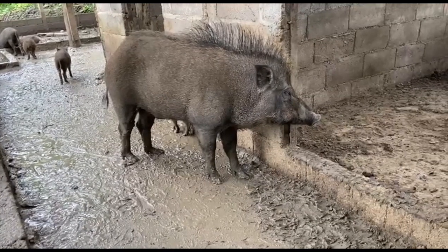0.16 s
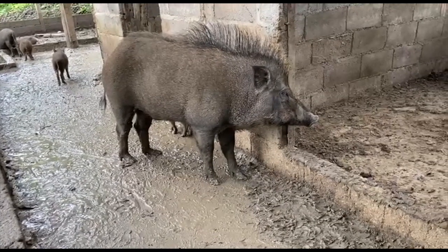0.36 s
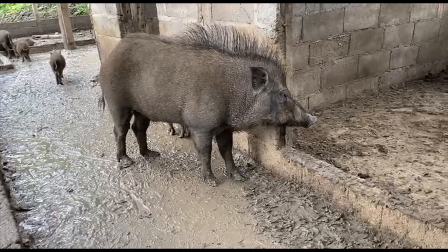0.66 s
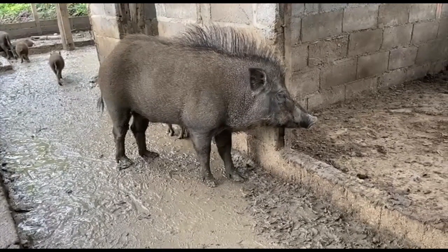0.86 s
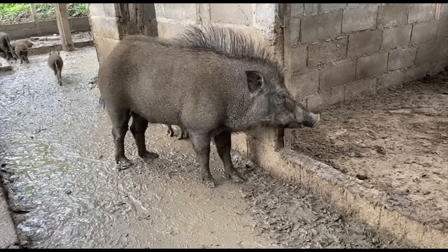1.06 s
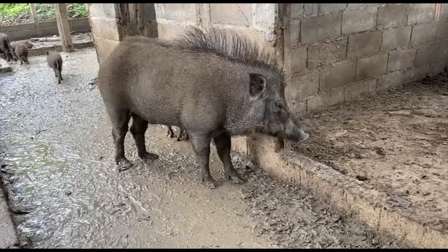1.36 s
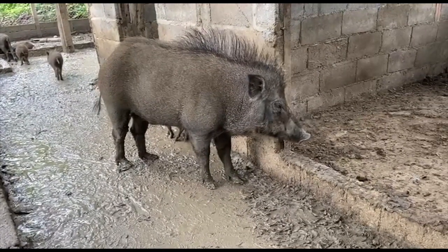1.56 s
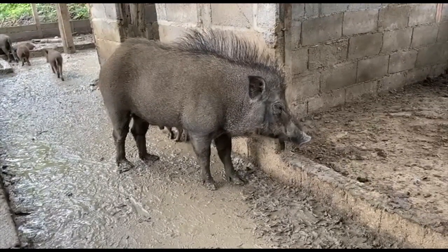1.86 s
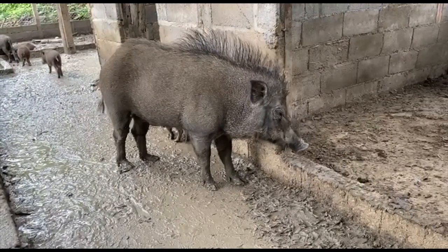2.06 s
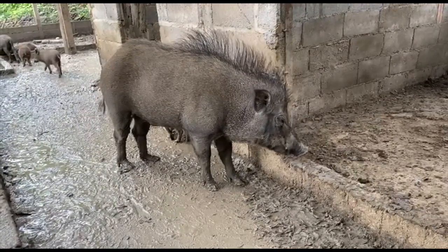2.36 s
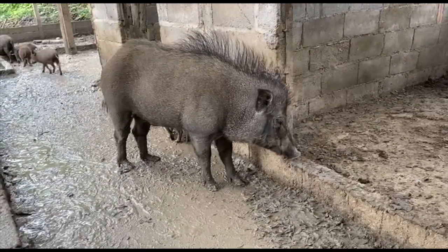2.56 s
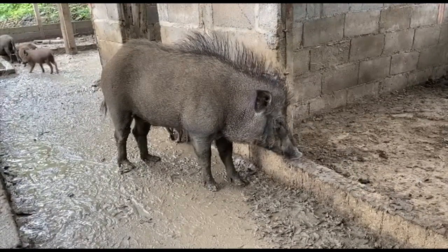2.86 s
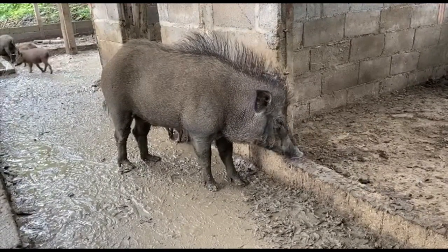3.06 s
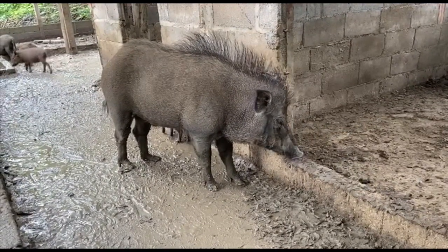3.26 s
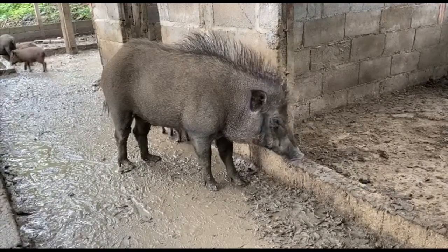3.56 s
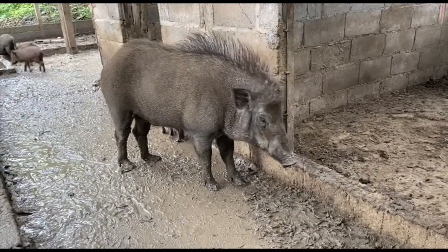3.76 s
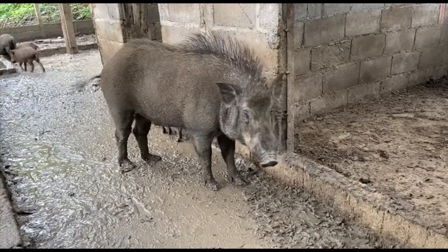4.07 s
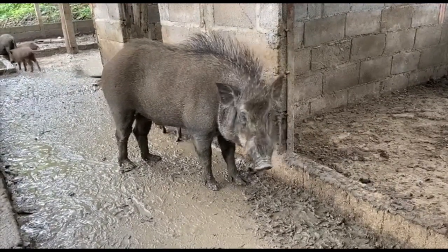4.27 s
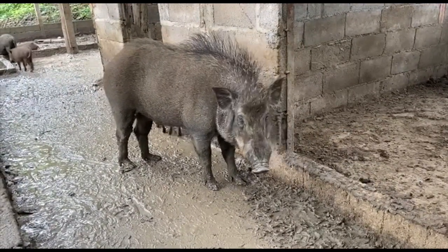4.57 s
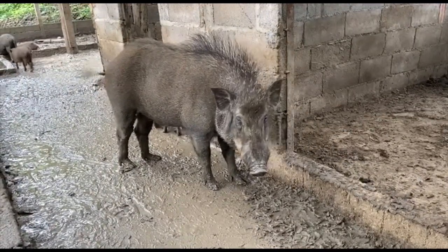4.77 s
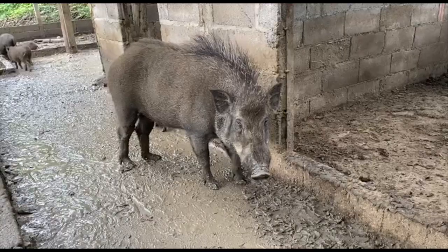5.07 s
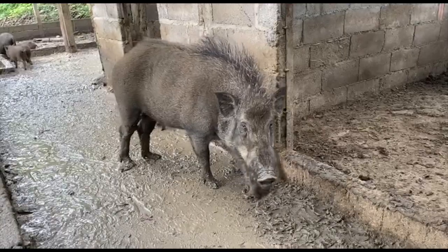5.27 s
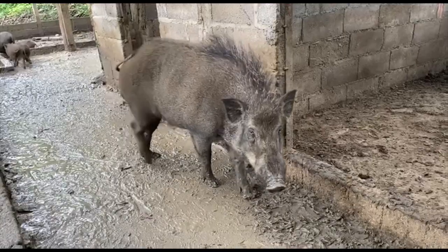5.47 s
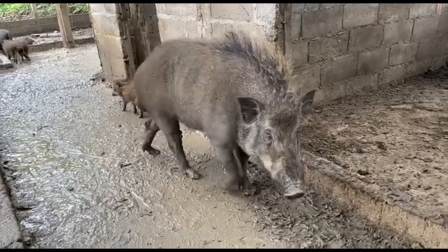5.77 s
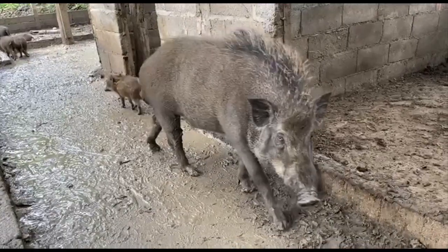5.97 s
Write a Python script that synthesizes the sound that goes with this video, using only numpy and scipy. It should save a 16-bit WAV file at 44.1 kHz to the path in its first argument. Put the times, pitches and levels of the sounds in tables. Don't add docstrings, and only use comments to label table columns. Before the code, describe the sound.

Hollow hoof knocks, muddy plops and two breathy boar snorts sound close by, over distant engine throb, hissing insects and high bird chips.

```python
import sys
import numpy as np
from scipy import signal
from scipy.fft import rfft, irfft
from scipy.io import wavfile
from scipy.ndimage import uniform_filter1d

SR = 44100
rng = np.random.default_rng(int(sys.argv[2]) if len(sys.argv) > 2 else 0)


def how_loud(loudness_db):
    steps = np.asarray(loudness_db, float) / 20
    return 10 ** steps


def log_audio(samples):
    frames = np.atleast_2d(samples).T
    limited = np.clip(frames, -1, 1)
    pcm = np.round(limited * 32767).astype(np.int16)
    wavfile.write(sys.argv[1], SR, pcm)


N = 270333


def table(rows, column):
    rows = np.array(rows)
    return np.interp(np.arange(N) / SR, rows[:, 0], rows[:, column])


def level(x, db):
    return x * how_loud(db) / np.sqrt(np.mean(x ** 2))


def band(x, hz, width):
    return signal.lfilter(*signal.iirpeak(hz, hz / width, fs=SR), x)


def band_twice(x, hz, width):
    return band(band(x, hz, width), hz, width)


def walk(rate):
    k = int(SR / rate)
    held = np.repeat(rng.standard_normal(N // k + 1), k)
    return 1.3 * uniform_filter1d(uniform_filter1d(held, k), k)[:N]


def place(x, pan_db, lag):
    f = np.arange(N // 2 + 1) / N
    late = irfft(rfft(x) * np.exp(-2j * np.pi * f * lag), N)
    return np.array([x * how_loud(pan_db / 2), late * how_loud(-pan_db / 2)])


def add(out, s, x):
    i = int(s * SR)
    out[i:i + len(x)] += x[:N - i]


def ring(hz, t60, phase=0, rise=0.42, size=17640):
    t = np.arange(size) / SR
    decay = np.exp(-np.log(1000) * t / max(t60, .004))
    return np.sin(2 * np.pi * hz * t + phase) * decay * (1 - np.exp(-t * hz / rise))


def strike(modes, scatter, rise):
    chance = rng.standard_normal((len(modes), 2))
    return sum(how_loud(db + a) * ring(hz * (1 + scatter * b), t60, 3 * a, rise, size=44100)
               for (hz, db, t60), (a, b) in zip(modes, chance))


def burst(t60, rise):
    return rng.standard_normal(size=17640) * ring(0.91, t60, np.pi / 2, rise)


def yard(x, wet_db, t60=0.28):
    t = np.arange(int(.5 * SR)) / SR
    decay = np.exp(-np.log(1000) * t / t60) * np.clip(t / 0.0041, 0, 1)
    tail = rng.standard_normal((2, len(t))) * decay
    tail /= np.sqrt(np.sum(tail ** 2, axis=1, keepdims=True))
    return how_loud(wet_db) * signal.fftconvolve(x[None], tail, axes=1)[:, :N]


STEADY_S = .06


def flaps(t):
    ragged = np.clip(t / STEADY_S - 1, 0, 1)
    flap_hz = 59 * how_loud(ragged * (2 + 3 * walk(70)))
    turns = np.cumsum((t >= 0) * flap_hz) / SR
    phase = turns % 1
    size = how_loud(ragged * rng.standard_normal(N // 100)[turns.astype(int)])
    beat = 9 * size * (np.diff(phase, prepend=0) < 0)
    puff = size * np.exp(-phase / 0.53) * rng.standard_normal(N)
    rush = (0.35 + 0.46 * ragged) * rng.standard_normal(N)
    return ragged, beat, puff, rush


def throat_voice(ragged, beat, puff, rush, snout, top_hz):
    source = (3 - 1.1 * ragged) * beat + puff + rush
    throat = sum(how_loud(db) * band_twice(source, hz, 1.05 * width) for hz, width, db in snout)
    throat = signal.sosfilt(signal.ellip(4, 1, 18, top_hz, fs=SR, output="sos"), throat)
    return throat / np.sqrt(uniform_filter1d(throat ** 2, size=1100) + 1e-9)


def nostril_hiss(t, length, beat, puff, rush, nostril, snap_db):
    slack = np.clip(t / STEADY_S - .5, 0, 1)
    jet = (1 - slack) ** 2 * how_loud(snap_db) * beat
    jet = jet + (1 - 0.85 * slack) * puff + (0.55 + 0.85 * slack) * rush
    hiss = sum(how_loud(db) * band_twice(jet, hz, 1.4 * width) for hz, width, db in nostril)
    return hiss / np.std(hiss[(t > 0) & (t < length)])


# first flap in seconds, length in s, peak in dB, nostril hiss in dB, flap snap in dB.
SNORTS = [
    (0.625, 0.16, -37.5, -0.6, -5),
    (3.313, 0.31, -34.5, -8, 7.5),
]
# seconds from the first flap, level in dB.
EFFORTS = [
    [(0, -5.5), (.03, -2), (.052, 1.5), (.075, -4.5), (.1, -4), (.135, -3), (.155, -10), (.19, -26),
     (.3, -70)],
    [(0, -6.5), (.02, -6), (.048, 1), (.1, -3.5), (.15, -4), (.19, -3), (.25, -6), (.29, -15.5), (.4, -67)],
]
# centre in Hz, width in Hz, gain in dB.
SNOUTS = [
    [(137, 59, -2), (254, 73, 3), (323, 160, 0), (484, 120, -11), (627, 170, -14)],
    [(146, 24, 4), (247, 150, 4), (320, 100, 0.5), (507, 100, 0.5), (646, 83, -6.5), (742, 100, -14.5)],
]
# centre in Hz, width in Hz, gain in dB.
NOSTRILS = [
    [(853, 180, 0.5), (1132, 250, -6), (2200, 280, 1.5), (3100, 390, 1), (4150, 600, 0), (5200, 400, 1),
     (6250, 1200, -4.5), (9700, 1800, -16.5)],
    [(920, 160, 1), (1070, 250, -2.5), (2200, 400, -0.5), (3380, 790, 1.5), (4200, 600, -2.5),
     (5150, 300, -2), (6570, 1100, -10), (9500, 2300, -17)],
]
SNOUT_TOPS_HZ = (630, 750)


def snorts():
    peak_s, rise_db, fades_db_per_s = 0.018, -6, (209, 126)
    voice, nose = np.zeros((2, N))
    settings = zip(SNORTS, EFFORTS, SNOUTS, NOSTRILS, SNOUT_TOPS_HZ, fades_db_per_s)
    for (s, length, db, hiss_db, snap_db), effort, snout, nostril, top_hz, fade_db in settings:
        t = np.arange(N) / SR - s
        ragged, beat, puff, rush = flaps(t)
        throat = throat_voice(ragged, beat, puff, rush, snout, top_hz)
        hiss = nostril_hiss(t, length, beat, puff, rush, nostril, snap_db)
        effort_db = np.interp(t, *np.transpose(effort))
        nose_db = hiss_db + np.interp(t, [0, peak_s], [rise_db, 0])
        nose_db = nose_db - fade_db * np.clip(t - peak_s, 0, None)
        voice += (t >= 0) * how_loud(db + effort_db) * throat
        nose += (t >= 0) * how_loud(db + effort_db + nose_db) * hiss
    return place(voice, -.4, 1.0) + yard(voice, -16.5) + place(nose, 2.2, 1.9) + yard(nose, -2, 0.18)


# start in seconds, peak in dB, click in dB, boom in dB.
KNOCKS = [
    (0.575, -33, -17.5, -2.5),
    (0.941, -31, -19, -4.5),
    (1.391, -34, -14, -4),
    (1.902, -39.5, -14, 0.5),
    (2.472, -29.5, -19, -6.5),
    (4.372, -35, -16, -7),
    (5.73, -40.5, -6, 1.5),
]
# pitch in Hz, level in dB, t60 in s.
BOARD = [(270, -5, 0.19), (320, 5, 0.072), (405, -4.5, 0.082), (496, -18.5, 0.057)]
# pitch in Hz, level in dB, t60 in s.
BOARD_CLICK = [(663, 8, 0.053), (828, 12, 0.037), (1084, 10, 0.046), (1650, 0, 0.048), (3000, -39, .015)]
# pitch in Hz, level in dB, t60 in s.
BOOM = [(122.4, -0.5, 0.33), (171, -12, 1.34), (202.1, 7.5, 0.23)]


def knocks():
    plank, cavity = np.zeros((2, N))
    for s, db, click_db, boom_db in KNOCKS:
        click = how_loud(click_db) * strike(BOARD_CLICK, 0.05, 0.36)
        add(plank, s, how_loud(db - 4.5) * (strike(BOARD, 0.01, 1.0) + click))
        add(cavity, s, how_loud(db - 5.0 + boom_db) * strike(BOOM, 0.0093, 1.55))
        crack = rng.standard_normal(size=17640) * ring(1, .05, np.pi / 2, 0.0022)
        add(plank, s, how_loud(db + click_db + 5.5) * band(crack, 1400, 1500))
    direct = place(plank, 2.1, 18.6) + place(cavity, 0.95, 17.0)
    return direct + yard(plank, -9.0) + yard(cavity, -34.0)


# start in seconds, peak in dB, pitch in Hz, cycles to swell.
PLOPS = [(1.032, -56, 628, 1.1), (1.275, -56, 716, 1.5), (1.647, -36.5, 670, 7.8), (2.303, -38.5, 593, 2),
         (2.306, -42.5, 698, 4.4), (2.318, -42.5, 655, 2.5), (3.289, -53.5, 550, 1.5),
         (3.67, -58, 670, 1.3), (4.997, -49.5, 508, 1.2), (5.88, -48, 686, 1.5), (6.047, -52.5, 830, 1.5)]
POCKET_RATIOS = (1.3, 1.37)


def plops():
    out = np.zeros(N)
    for s, db, hz, swell in PLOPS:
        t60 = 40 / hz
        pocket = ring(hz, t60, 0, swell)
        pocket += 0.19 * ring(POCKET_RATIOS[0] * hz, 0.8 * t60, 1.6, swell)
        pocket += 0.27 * ring(POCKET_RATIOS[1] * hz, 0.65 * t60, 0, 1.6 * swell)
        add(out, s, how_loud(db + 5.0) * pocket)
    return out


# start in seconds, peak in dB, centre in Hz.
SMACKS = [(0.1624, -54, 2570), (0.47, -55, 2370), (0.529, -52.5, 1730), (0.6023, -51, 1207),
          (0.922, -55, 1760), (1.212, -53.5, 2400), (1.303, -55.5, 2310), (1.567, -50, 1443),
          (1.764, -59.5, 2080), (1.936, -51.5, 2410), (2.545, -60, 1880), (2.576, -56, 2320),
          (2.695, -56, 1720), (3.276, -56, 2080), (3.624, -55.5, 3620), (3.939, -59, 2066),
          (3.989, -51, 2700), (4.272, -55.5, 2200), (4.34, -66.5, 2200), (4.732, -57, 1580),
          (5.585, -52, 1890)]


def smacks():
    out = np.zeros(N)
    for s, db, hz in SMACKS:
        spatter = burst(0.11, 0.0055)
        add(out, s, how_loud(db + 16.0) * (band(spatter, hz, 0.2 * hz) + 0.18 * band(spatter, 4000, 5000)))
    return out


# start in seconds, peak in dB, pitch in Hz.
THUMPS = [(0.393, -58, 323), (0.799, -50, 290), (1.129, -67, 152), (2.819, -48, 320), (2.9, -61, 604),
          (3.0, -60, 700), (3.789, -43.5, 147), (4.257, -54, 250), (4.497, -48, 150), (4.927, -40.5, 154),
          (5.164, -46.5, 204), (5.213, -44, 191)]


def thumps():
    out = np.zeros(N)
    for s, db, hz in THUMPS:
        add(out, s, how_loud(db + 20.0) * band(burst(0.16, 0.00084), hz, 0.24 * hz))
    return out


# start in seconds, peak in dB, t60 in s.
SPRAYS = [
    (0.643, -58, .15),
    (2.992, -55, 0.13),
    (5.597, -55, 0.064),
    (5.763, -50.5, .07),
    (5.959, -56, .08),
]


def sprays():
    out = np.zeros(N)
    for s, db, t60 in SPRAYS:
        add(out, s, how_loud(db + 18.0) * band_twice(burst(t60, 0.0066), 10100, 2200))
    return out


TICK_RISE_S = 0.00091
# start in seconds, peak in dB, centre in Hz.
TICKS = [
    (1.4596, -49.5, 2720),
    (2.304, -53, 2350),
    (3.7923, -58, 3860),
    (5.1535, -50, 3660),
    (5.165, -45, 3530),
    (5.2873, -53, 3000),
    (5.769, -47.5, 2460),
]


def ticks():
    out = np.zeros(N)
    for s, db, hz in TICKS:
        crack = burst(.04, TICK_RISE_S)
        add(out, s, how_loud(db + 11.0) * (band(crack, hz, 0.32 * hz) + .4 * band(crack, 4000, 5000)))
    return out


# middle in seconds, half length in s, peak in dB.
SCUFFS = [
    (2.2, .055, -55.5),
    (3.004, 0.023, -64),
]
# start in seconds, peak in dB, centre in Hz.
GRAINS = [
    (2.146, -61, 2320),
    (2.17, -54, 2700),
    (2.179, -54, 1540),
    (2.184, -49, 2580),
    (2.191, -53, 1460),
    (2.21, -51, 3100),
    (2.2284, -49, 1410),
    (2.24, -61, 1440),
]


def scuffs():
    out = np.zeros(N)
    for s, db, hz in GRAINS:
        add(out, s, how_loud(db + 21.0) * band_twice(burst(.05, TICK_RISE_S), hz, 0.17 * hz))
    bands = ((770, 320, 1.1), (1480, 280, 1.0), (2160, 510, 1.4), (2700, 500, 0.87), (5150, 5300, 0.12))
    for s, half, db in SCUFFS:
        grit = rng.standard_normal(N) * how_loud(2.5 * walk(500))
        patches = sum(g * how_loud(3.1 * walk(40)) * band(grit, hz, width) for hz, width, g in bands)
        swell_db = -14 * ((np.arange(N) / SR - s) / half) ** 4
        out += how_loud(db + swell_db) * level(patches, 0)
    return out


def mud():
    ground = sprays() + thumps() + smacks() + ticks() + scuffs()
    pockets = plops()
    return place(ground, 1.3, 1.1) + place(pockets, -1.9, -6.0) + yard(ground + pockets, -5)


def whistle(out, shape, s, db, scale=1, rough_db=2.5, warble=.005):
    at, hz, gain_db = np.transpose(shape)
    t = np.arange(at[0], at[-1], 1 / SR)
    wobble = uniform_filter1d(rng.standard_normal((2, 8192)), size=60, axis=1)[:, :len(t)] * 8
    pitch = scale * np.interp(t, at, hz) * (1 + warble * wobble[0])
    loud = how_loud(db + np.interp(t, at, gain_db) + rough_db * wobble[1])
    track = np.zeros(N)
    add(track, s + at[0], np.sin(2 * np.pi * np.cumsum(pitch) / SR) * loud)
    return out + track


# seconds from the start, pitch in Hz, level in dB.
HOOK = [(-.001, 3950, -14), (.006, 4250, -3), (.013, 4480, 1), (.022, 4180, 3), (.034, 4130, 3),
        (.044, 4500, 1), (.05, 5450, -2), (.058, 5750, 1), (.07, 5600, -1), (.082, 4500, -9)]
SWOOP = [(0, 5800, -13.5), (.01, 5700, 1), (.018, 5380, -1.5), (.022, 5400, -13), (.027, 5600, -1),
         (.036, 5944, 4), (.047, 5664, -1.5), (.061, 4520, 6), (.072, 4080, -1.5), (.086, 3800, -2),
         (.105, 3454, -2), (.138, 3020, -22)]
SECOND_HOOK = [(0, 4150, -8), (.006, 4475, -10), (.016, 4480, 1.5), (.03, 4360, -8), (.041, 4660, 0.5),
               (.048, 5690, -0.5), (.058, 5780, 2), (.066, 5350, -2.5), (.077, 4570, -2.5),
               (.084, 4230, -28)]
# shape, start in seconds, level in dB, anchor in Hz, reach from the anchor as a share.
NEAR_CALLS = [
    (HOOK, .25, -37.5, 5800, 0.99),
    (SWOOP, 4.11, -44.5, 3700, 1.02),
    (SECOND_HOOK, 5.34, -40, 5800, 1),
    (SWOOP, 5.831, -44.5, 3700, .87),
]


def near_bird():
    calls = 0
    for shape, s, db, anchor_hz, reach in NEAR_CALLS:
        bent = [(at, anchor_hz + reach * (hz - anchor_hz), g) for at, hz, g in shape]
        calls = whistle(calls, bent, s, db, 1, 2, .004)
    out = how_loud(2.2) * place(calls, 3, 1.4) + yard(calls, -2.5, .4)
    out[1] -= .87 * band(out[1], 4330, 1300)
    return out


TREES_T60_S = 0.37
# start in seconds, level in dB, pitch in Hz, tail in dB, climb as a share of the usual.
CHIPS = [(.015, -58, 4270, -16, 1), (0.179, -60.5, 4350, -6.5, 0.85), (.515, -56, 4445, -13, 1),
         (.685, -61, 4440, -8, 1), (.843, -57.5, 4410, -6, 0.52), (1.113, -57, 4450, -9, 1),
         (1.275, -58.5, 4470, -9, 0.96), (1.456, -59, 4325, -16, 1), (1.613, -55.5, 4404, -8, 1),
         (1.782, -55, 4330, -4, 0.24), (1.952, -57, 4480, -4.5, 0.62), (2.131, -53, 4480, -5, 1.17),
         (2.255, -58, 4310, -6.5, 2.6), (2.425, -53.5, 4500, -9, 1.4), (2.605, -56, 4540, -5, 1.64),
         (2.774, -54.5, 4470, -6, 1.34), (2.944, -55.5, 4570, 1, 2.5), (3.111, -56, 4200, -4, 0.087),
         (3.255, -57.5, 4460, 0.5, 2.4), (3.429, -55.5, 4300, -7, 1.1), (3.6, -65, 3820, -2, 1.16),
         (3.788, -60, 4240, 1.5, 1), (4.316, -56.5, 4430, -6, 1), (4.503, -57.5, 4200, -9, 1),
         (4.683, -59.5, 4200, -12, 1.1), (5.015, -55, 4480, -9, 1), (5.532, -56.5, 4490, -7.5, 1.44),
         (5.692, -59, 4434, -0.5, 1)]
# seconds from the start, pitch offset as a share, level in dB.
CHIP = [(0, -.06, -14), (.011, -.035, -3), (.024, -.01, 1), (.033, .01, 1), (.041, -.01, -16)]
# seconds from the start, share of the pitch, level in dB.
CHIP_TAIL = [(.033, 1.03, -6.5), (.04, .97, 5.5), (.047, 0.96, 4), (.056, .775, -7), (.063, 0.86, -14)]
# seconds from the start, pitch in Hz, level in dB.
ARCH = [(0, 3860, -16), (0.014, 4150, 3), (0.031, 4300, 1), (0.046, 3980, -1), (.06, 3800, -5),
        (0.076, 3670, -23)]


def far_bird():
    calls = whistle(0, ARCH, 1.015, -58, warble=.008)
    for s, db, hz, tail_db, climb in CHIPS:
        note = [(at, 1 + climb * offset, g) for at, offset, g in CHIP]
        calls = whistle(calls, note, s, db, hz, 2.8, .008)
        calls = whistle(calls, CHIP_TAIL, s, db + tail_db, hz, 2.8, .008)
        calls = whistle(calls, note, s, db - 11, hz / 2, 2.2, 0.0069)
    return place(calls, 2.5, 0.97) + yard(calls, .3, TREES_T60_S)


# start in seconds, level in dB.
CLUCKS = [
    (4.8265, -57.5),
    (5.0495, -47.5),
    (5.269, -46.5),
    (5.489, -45.5),
    (5.717, -47),
    (5.955, -49.5),
]
# start in seconds, level in dB.
ANSWERS = [
    (4.919, -54),
    (5.14, -50.5),
    (5.361, -49),
    (5.586, -50.5),
    (5.826, -50),
]
# seconds from the start, pitch in Hz, level in dB.
CLUCK = [(-.03, 2200, -25), (-.022, 2330, -8), (-.013, 2520, -11), (-.006, 2650, -28), (.001, 2560, 0),
         (.009, 2330, 0), (0.018, 2220, -8), (.05, 2270, -19), (.075, 2300, -27)]
ANSWER = [(0, 1882, -15), (.012, 1861, -11), (0.029, 1694, -17.5), (.04, 1577, -3.5), (.048, 1740, -19),
          (.056, 1780, -1.5), (.066, 1650, -27), (.082, 1571, -1), (.1, 1520, -23)]


def clucking_pair():
    calls = 0
    for s, db in CLUCKS:
        calls = whistle(calls, CLUCK, s, db - 2, 1, 4, .009)
    for s, db in ANSWERS:
        calls = whistle(calls, ANSWER, s, db - 2, 0.98, 4, .01)
    return place(calls, 2.7, 0.71) + yard(calls, -3, TREES_T60_S)


# seconds, firing cycle rate in Hz.
ENGINE = [(0, 12.05), (3, 12.13), (6.13, 12.12)]
# multiple of the cycle rate, level in dB.
ENGINE_ORDERS = [(4, -4), (5, -3), (6, -12.5), (7, 1.5), (8, -1), (9, -14), (10, -9.5)]
# seconds, level in dB.
ENGINE_DB = [(0.0, -55), (0.5, -53.5), (2.1, -55), (2.36, -56.5), (2.63, -54), (3.2, -56.5), (4.15, -49),
             (4.66, -55), (5.05, -48.5), (6.13, -52)]
# seconds, level in dB.
TRUCK = [(4.3, -91), (4.8, -52), (5.0, -46.5), (5.4, -51.5), (6.13, -57)]
# pitch in Hz, level in dB.
TRUCK_LINES = [(66.8, 4.5), (79.5, -22), (117, -4), (133.6, -24), (185.5, -13)]
# seconds, pitch in Hz, level in dB.
FAN = [(3.9, 125, -75), (4.1, 124.9, -57.5), (4.45, 122.5, -55), (4.7, 118.5, -79), (4.9, 120, -92)]


def engines():
    cycle = 2 * np.pi * np.cumsum(table(ENGINE, 1)) / SR
    late = 2 * np.pi * .46
    throb = 0
    for k, db in ENGINE_ORDERS:
        drift = 1.8 * (rng.random() - .5) + 0.42 * walk(2.66)
        throb = throb + how_loud(db + 1.4 * walk(2.51)) * np.cos(round(k) * (cycle - late) + drift)
    t = np.arange(N) / SR
    truck = sum(how_loud(db + 3.4 * walk(3.21)) * np.sin(2 * np.pi * hz * t + 1.4 * walk(2.475))
                for hz, db in TRUCK_LINES)
    drone = how_loud(table(FAN, 2)) * np.sin(2 * np.pi * np.cumsum(table(FAN, 1)) / SR)
    motors = drone + level(throb, 3.6) * how_loud(table(ENGINE_DB, 1)) + truck * how_loud(table(TRUCK, 1))
    return place(motors, -1.5, 3.3)


def colour(shape, db, stir_db):
    hz, gain_db = np.transpose(shape)
    f = np.maximum(np.arange(N // 2 + 1) * SR / N, 1)
    noise = rfft(rng.standard_normal(N)) * how_loud(np.interp(np.log(f), np.log(hz), gain_db))
    slot = np.clip(np.floor(3 * np.log2(f / 100)), 0, None).astype(int)
    out = np.zeros(N)
    for k in np.unique(slot):
        flicker_db = 1.6 * walk(7) + 1.5 * walk(24.947)
        out += how_loud(stir_db[k] + flicker_db) * irfft(noise * (slot == k), N)
    return level(out, db)


# frequency in Hz, density in dB per Hz.
AIR_MID = [(15, -6.5), (25, -9), (92, -1), (170, -18), (276, -20.5), (849, -32), (1150, -36.5), (2080, -33),
           (3130, -38), (3640, -33), (7080, -23), (8040, -27.5), (8680, -48.5), (9370, -29.5),
           (11200, -39.5), (14600, -123), (22000, -120)]
# frequency in Hz, density in dB per Hz.
AIR_SIDE = [(15, -64), (102, -3.5), (230, -12), (2080, -21.5), (2750, -27.5), (3300, -24), (4470, -20.5),
            (5210, -10.5), (6560, -17), (7080, -9), (8040, -8.5), (8700, -8), (9100, -30.5), (10700, -24)]
# seconds, level in dB.
STIR = [(0.0, -65), (1.59, -64.5), (2.01, -68.5), (2.42, -63.5), (3.3, -67.5), (3.46, -61.5), (3.62, -63),
        (4.7, -62.5), (5.27, -64), (6.13, -59.5)]
# centre in Hz, width in Hz, level in dB.
CICADAS = [(5126, 680, -68.5), (6130, 39, -71), (7183, 78, -64.5)]


def air():
    swell_db = table(STIR, 1) - table(STIR, 1).mean()
    stir_db = [0] * 2 + [0.77 * swell_db] * 7 + [0.88 * swell_db] * 7 + [0] * 3 + [1.5 * walk(12)] * 6
    mid = colour(AIR_MID, -51.5, stir_db)
    side = colour(AIR_SIDE, -57.5, stir_db)
    out = np.array([(mid + side) * how_loud(2.5), (mid - side) * how_loud(2.0)])
    for hz, width, db in CICADAS:
        buzz = level(band_twice(rng.standard_normal(N), hz, width), db)
        out += place(buzz * how_loud(1.1 * walk(2.1) + 0.5 * walk(36)), 7.5, 1.53)
    return out


def scene():
    return snorts() + knocks() + mud() + near_bird() + far_bird() + clucking_pair() + engines() + air()


def starve(x, coarse_db, smallest):
    f, _, z = signal.stft(x, SR, window="cosine", nperseg=2048)
    band_hz = f[:1024:8, None]
    size = np.abs(z[:1024]).reshape(128, 8, -1).mean(1)
    around = uniform_filter1d(np.sqrt(size), size=9, axis=0) ** 2
    whim_db = 7.5 * uniform_filter1d(rng.standard_normal(size.shape), size=2)
    thrift_db = 9 * uniform_filter1d(rng.standard_normal(size.shape[1]), size=4)
    busy = size[10:40].mean(0)
    busy_db = np.clip(30 * np.log10(busy / np.median(busy)), -2, 7)
    thrift_db = thrift_db + (band_hz < 8900) * busy_db
    floor_db = np.interp(band_hz, *np.transpose(smallest))
    step = np.maximum(how_loud(coarse_db + whim_db) * around, how_loud(floor_db + whim_db + thrift_db))
    step = np.repeat(step * np.clip(band_hz / 2500, .1, 1) ** 2, 8, axis=0)
    z[:1024] = step * np.round(z[:1024] / step)
    return signal.istft(z, SR, window="cosine", nperseg=2048)[1][:N]


def roll_off(x):
    return signal.sosfilt(signal.butter(12, 11360, fs=SR, output="sos"), x)


# frequency in Hz, step in dB.
STEP_MID = [(1200, -130), (7000, -108), (7550, -90), (7750, -86), (8150, -81), (8250, -74), (8900, -76),
            (9050, -94), (9900, -92), (10150, -86), (10400, -93), (10900, -90), (11150, -80)]
# frequency in Hz, step in dB.
STEP_SIDE = [(1200, -130), (8600, -105), (8850, -92), (9600, -80), (10800, -76), (11000, -96), (11700, -96),
             (11900, -85)]


def record(dry):
    dry = signal.sosfilt(signal.butter(2, 36, "high", fs=SR, output="sos"), dry)
    mid = starve(dry.mean(0), .5, STEP_MID)
    side = starve((dry[0] - dry[1]) / 2, 6, STEP_SIDE)
    return roll_off(np.array([mid + side, mid - side]))


dry = scene()
out = record(dry)
log_audio(out)
```